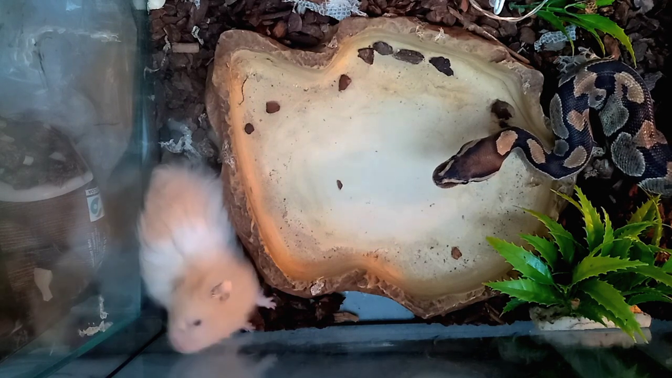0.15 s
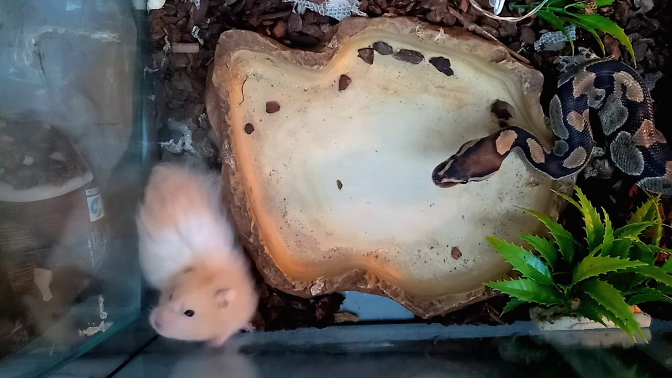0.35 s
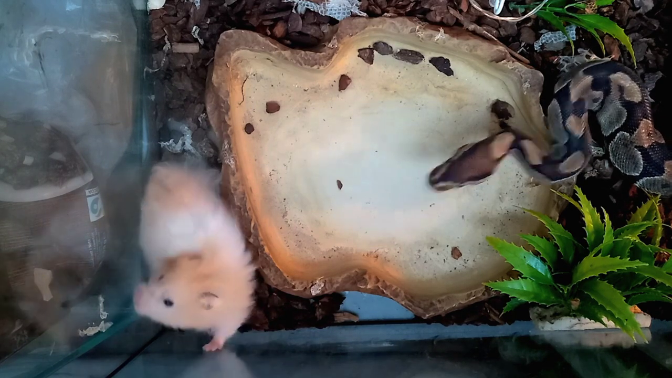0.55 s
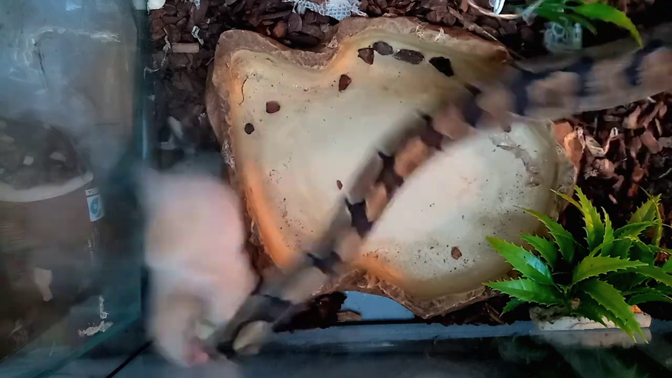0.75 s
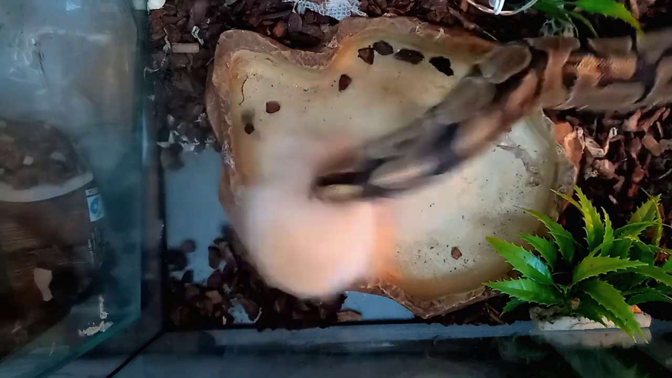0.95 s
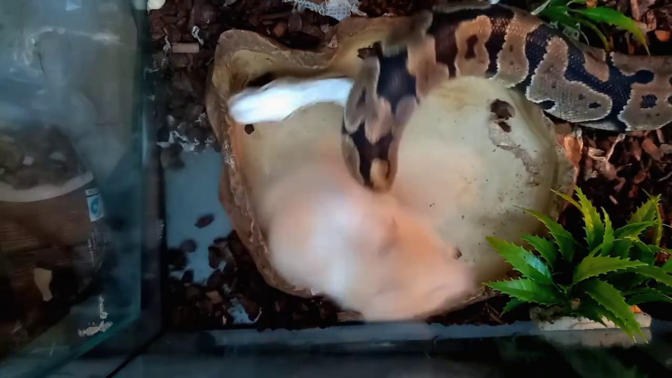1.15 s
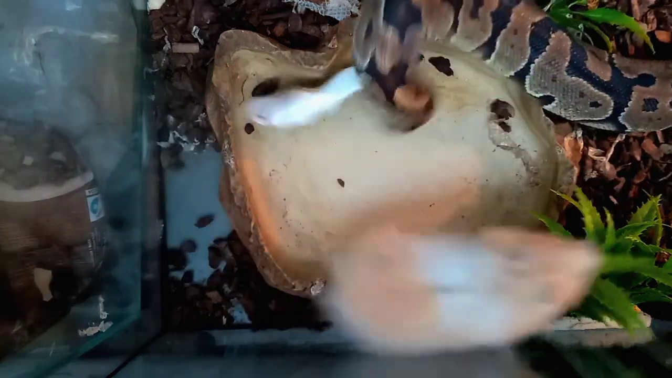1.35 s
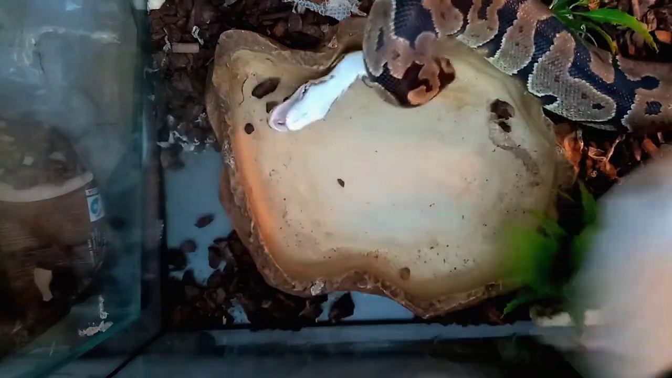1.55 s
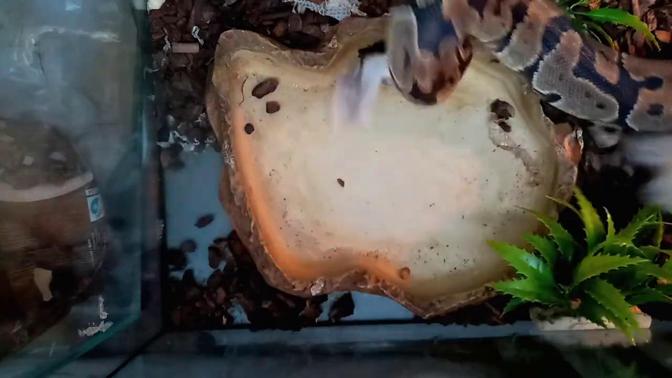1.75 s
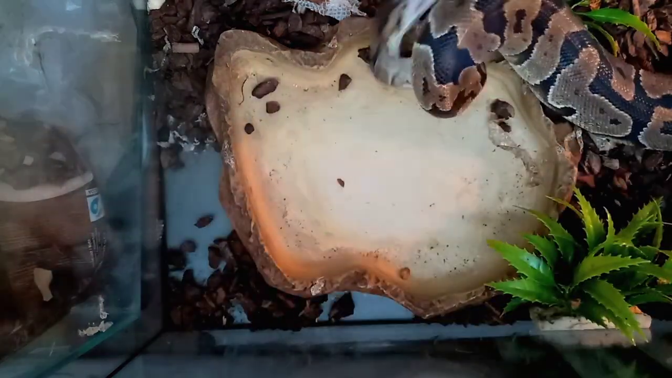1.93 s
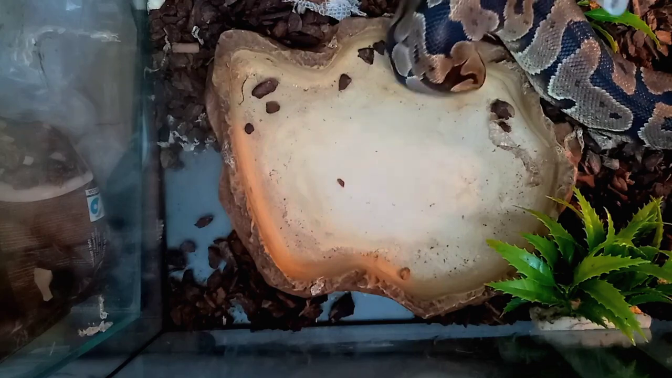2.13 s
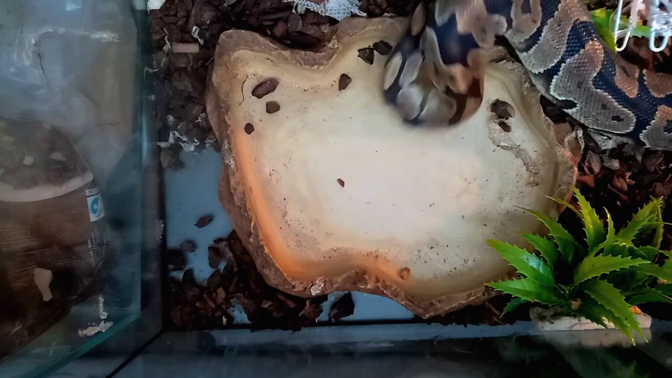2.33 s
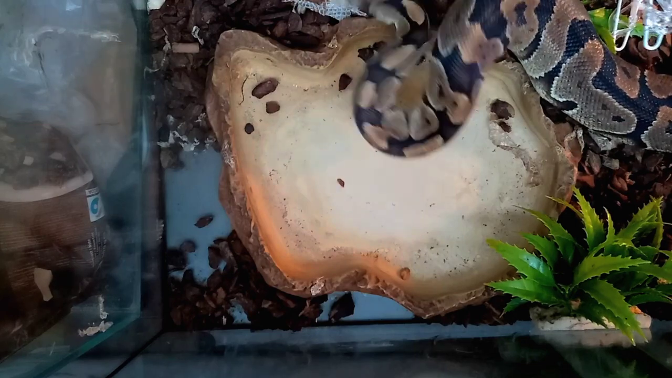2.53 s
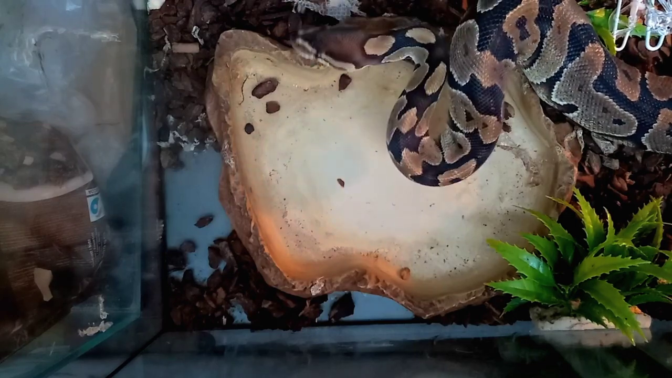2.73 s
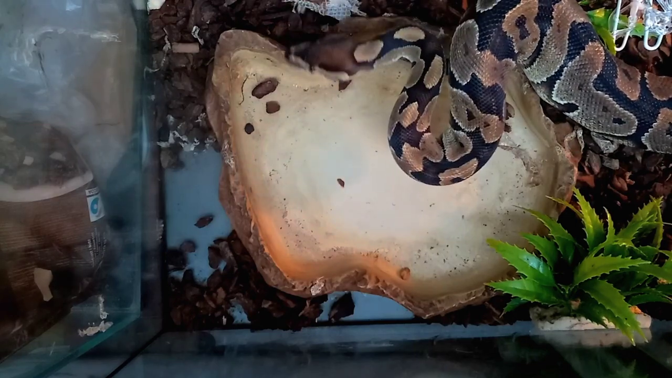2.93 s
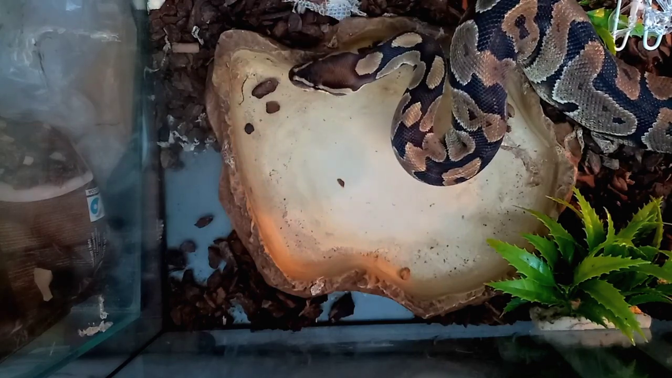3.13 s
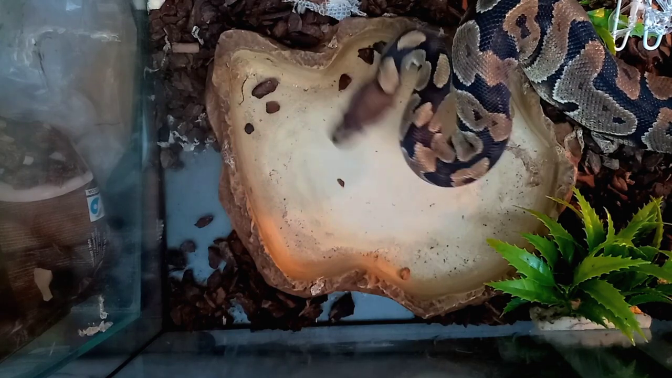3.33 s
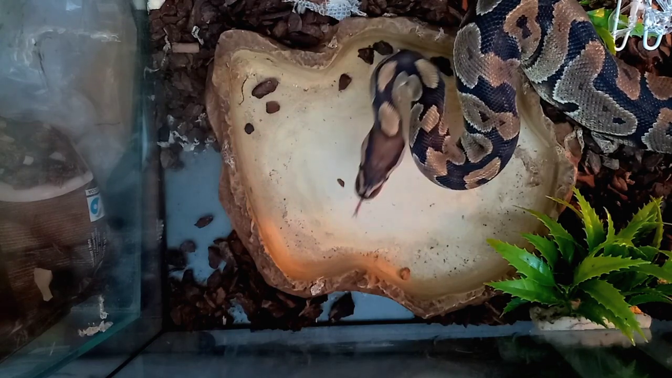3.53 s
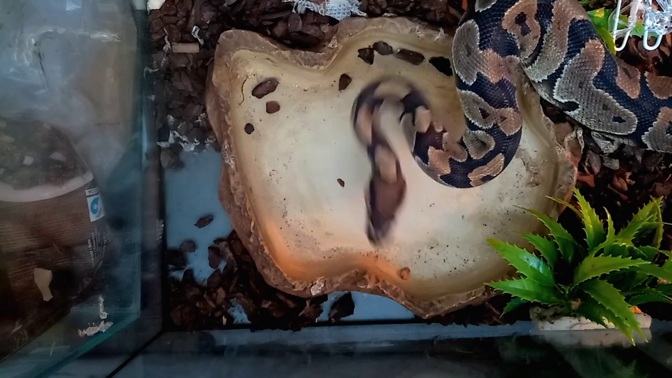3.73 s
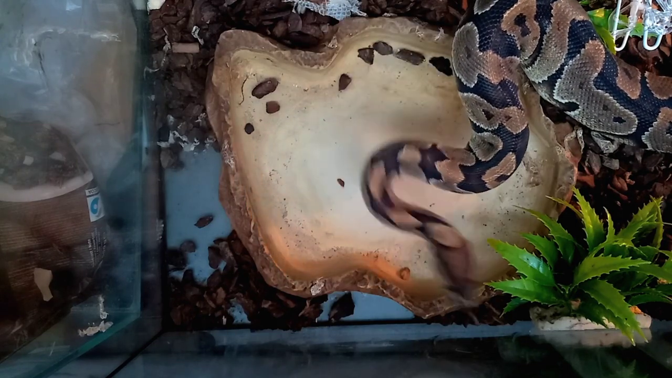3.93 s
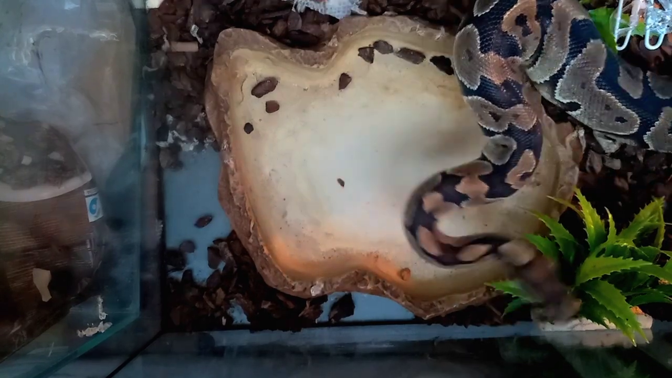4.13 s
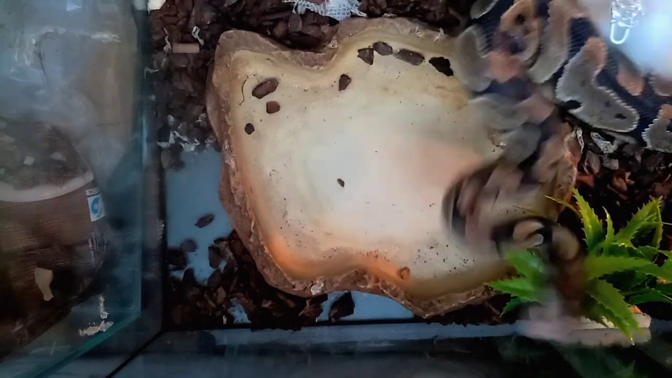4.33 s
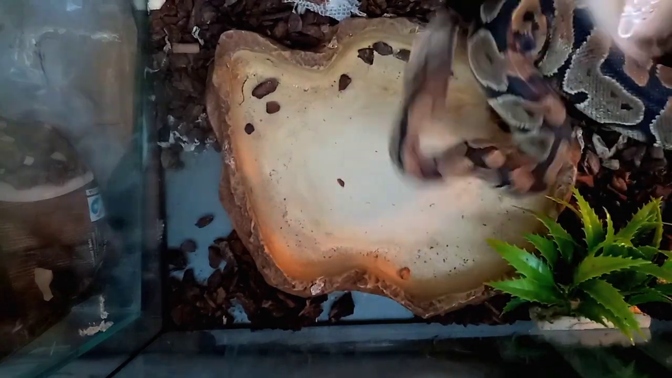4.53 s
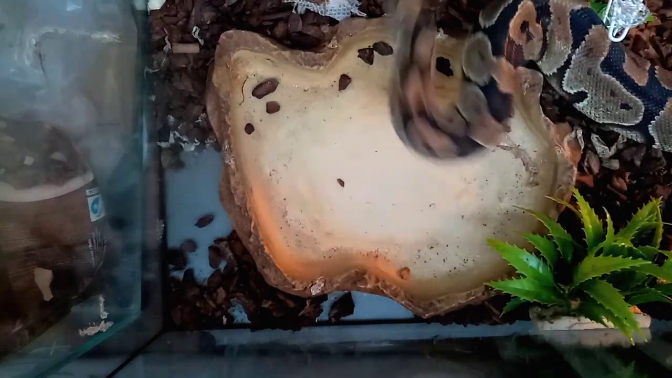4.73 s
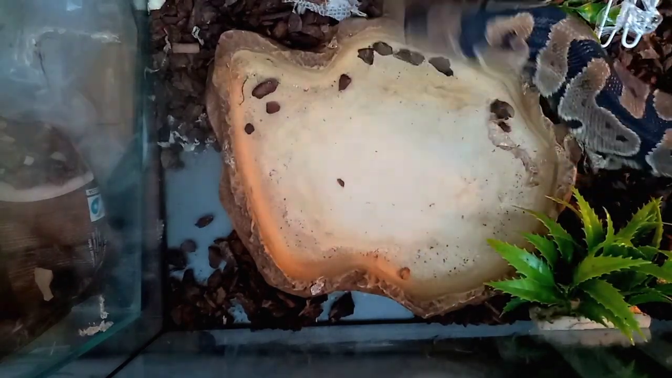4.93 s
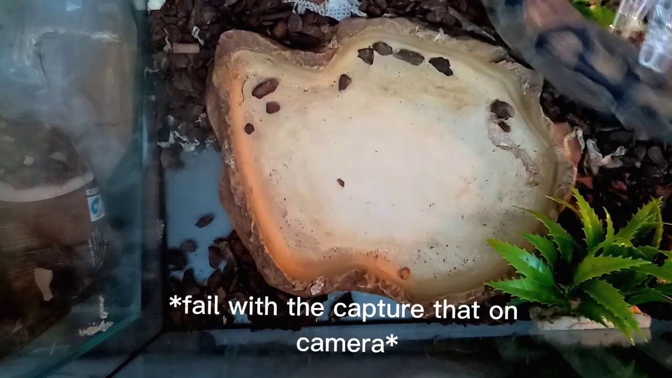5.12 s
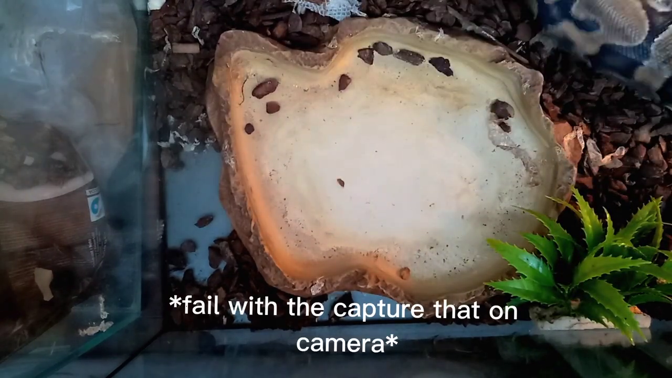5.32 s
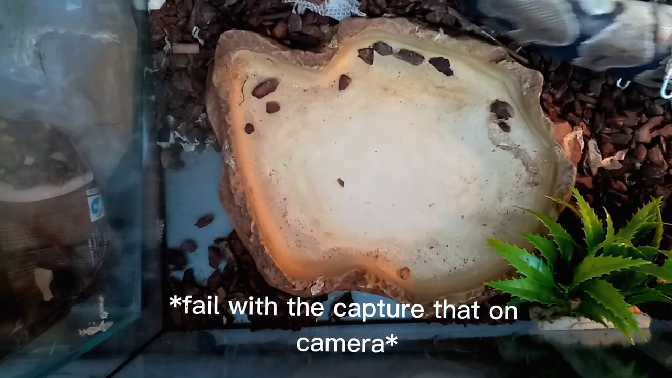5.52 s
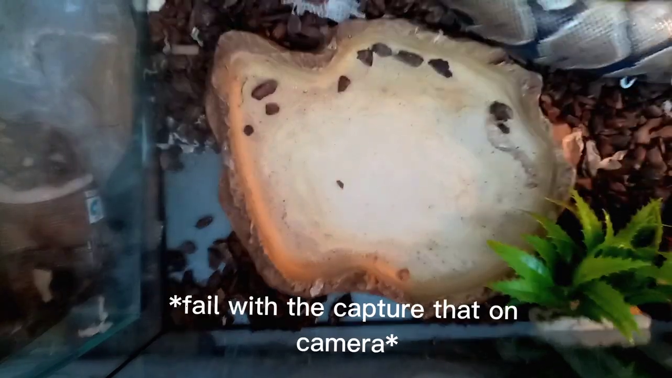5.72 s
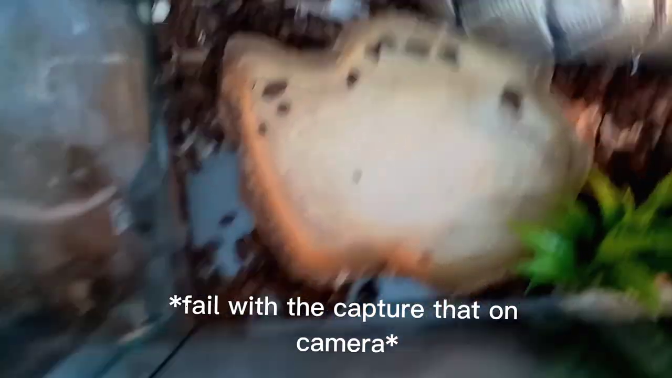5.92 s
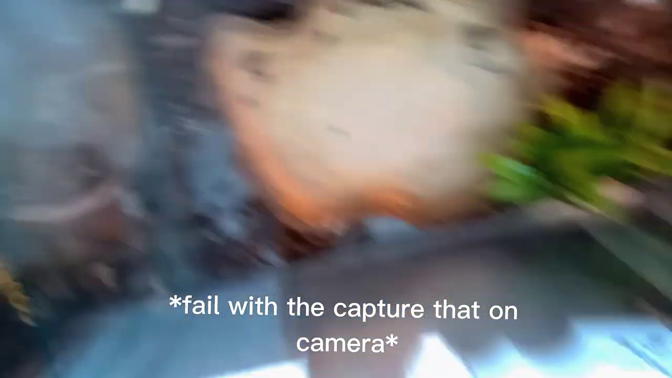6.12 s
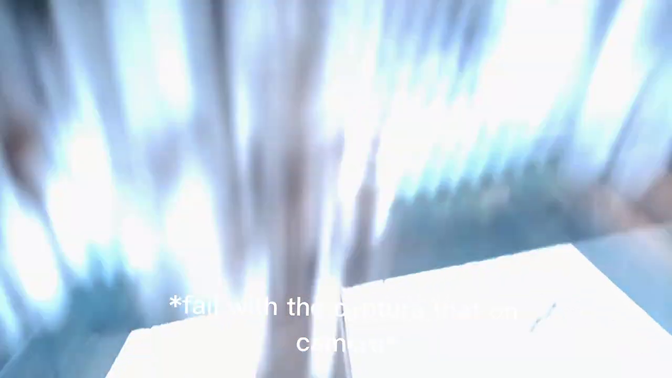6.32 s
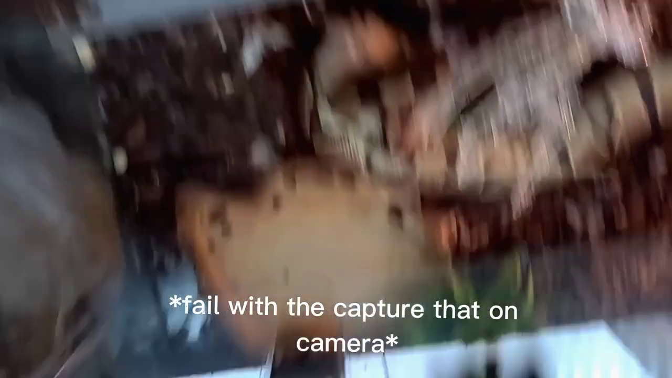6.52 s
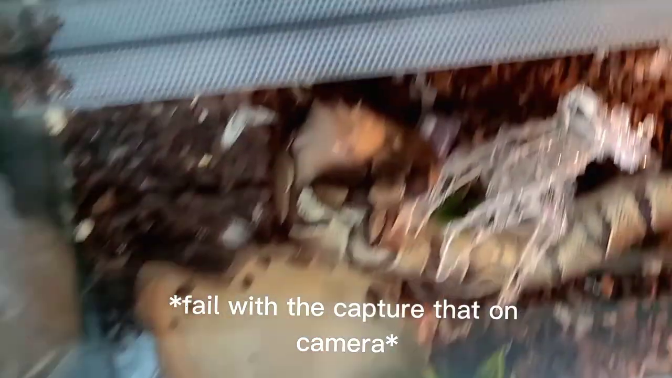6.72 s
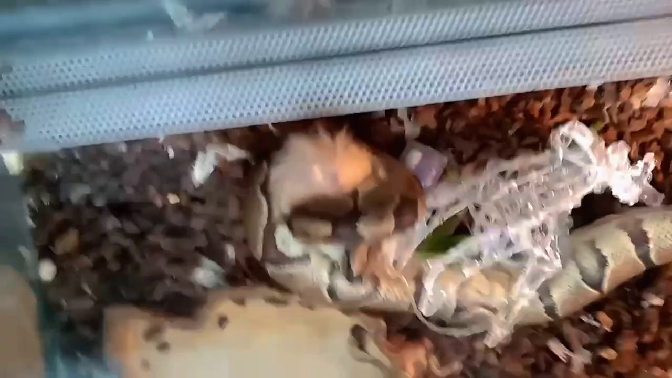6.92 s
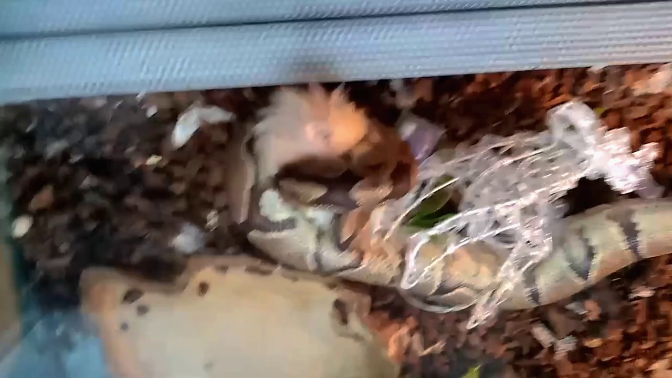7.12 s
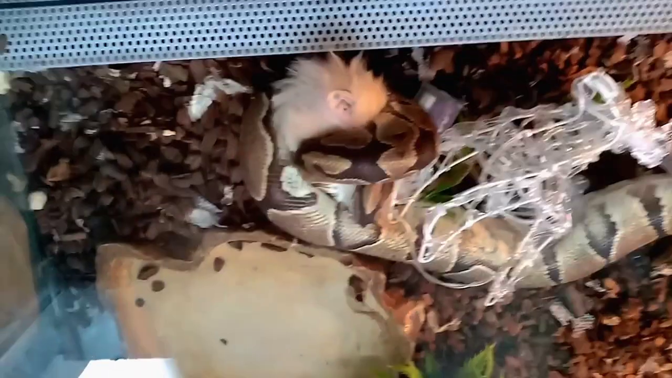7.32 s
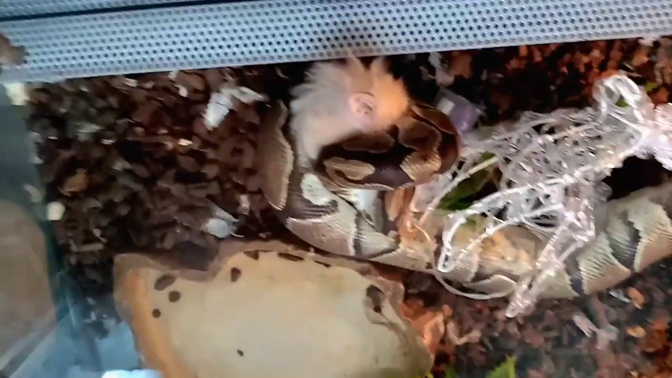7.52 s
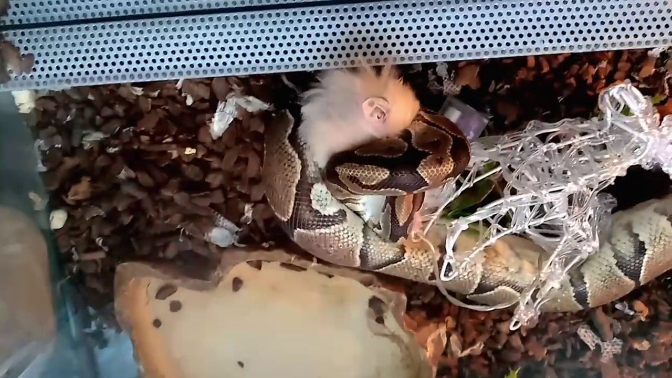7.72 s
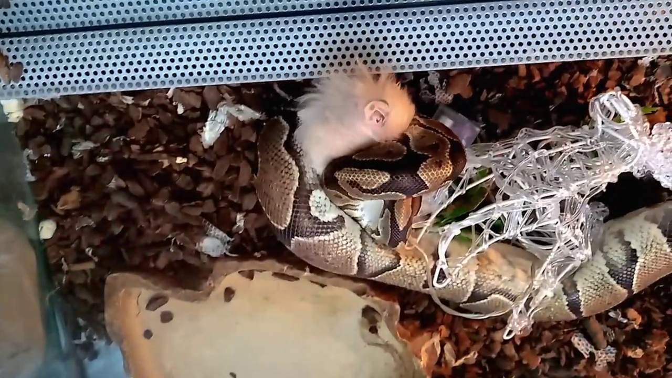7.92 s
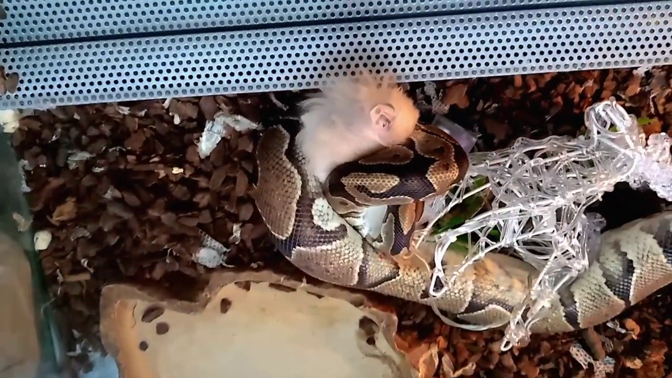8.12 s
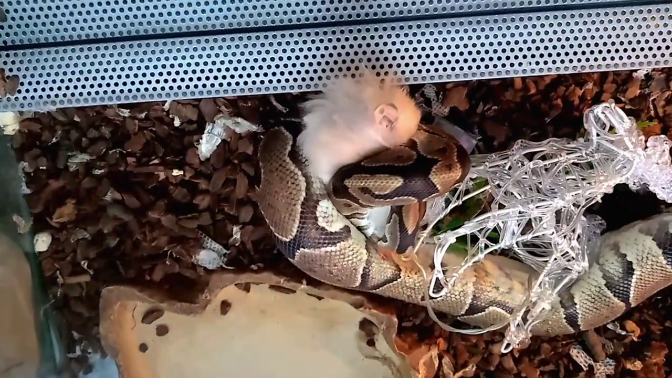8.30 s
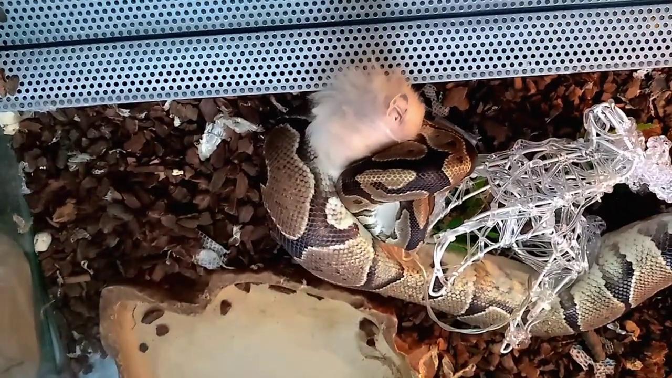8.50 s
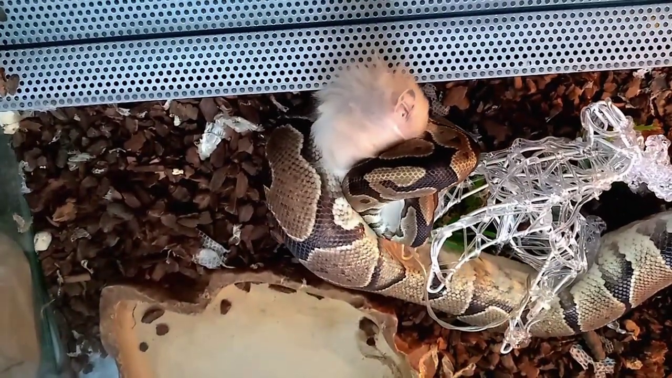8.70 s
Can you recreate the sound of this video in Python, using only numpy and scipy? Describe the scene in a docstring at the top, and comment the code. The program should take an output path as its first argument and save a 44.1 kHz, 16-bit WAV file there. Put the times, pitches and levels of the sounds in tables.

```python
"""In a glass tank a snake and a small rodent struggle. Bark bedding is thrown about, skin squeals over
dish and glass, bodies thump the base, and the air booms at one low note: shaped noise under drawn envelopes.
Knocks, thuds and clicks are noise bursts through resonances or colours; clicks and ticks add a brief tone.
Towards the end the struggle is faint, with stray knocks, clicks and ticks. Two microphone ports hear it,
the left earlier and louder over most of the range, above a faint steady room floor."""
import sys
import numpy as np
from scipy import signal
from scipy.fft import rfft, irfft, next_fast_len
from scipy.io import wavfile
from scipy.ndimage import uniform_filter1d, map_coordinates

SR = 44100
rng = np.random.default_rng(int(sys.argv[2]) if len(sys.argv) > 2 else 0)


def transcribe(signal):
    """Save signal, clipped to [-1, 1], as a 16-bit WAV file at the path in sys.argv[1]."""
    frames = np.atleast_2d(signal).T
    limited = np.clip(frames, -1, 1)
    pcm = np.round(limited * 32767).astype(np.int16)
    wavfile.write(sys.argv[1], SR, pcm)


def ratio_of_db(decibels):
    """Turn decibels (scalar or array-like) into linear amplitude factors; 0 dB maps to 1."""
    return 10 ** (np.asarray(decibels, float) / 20)


N = 386088

# Source levels are relative: each source has its own trim in its function.
# lunges and kicks in the bedding: (moment t/s, rise t/s, hold t/s, chip rustle level/dB, body scuff level/dB)
LUNGES = [(0.648, 0.025, .11, -35.5, -39), (0.808, .03, 0.08, -46.5, -42.5),
          (0.972, 0.11, .02, -45.5, -47.5), (1.051, 0.025, 0.031, -40, -35),
          (1.254, 0.0067, 0.044, -45, -38), (1.408, 0.013, .03, -36, -35),
          (1.506, 0.0055, 0.014, -37.5, -31.5), (1.599, 0.01, 0.0091, -36, -37.5),
          (1.672, 0.059, 0.07, -37.5, -37.5), (1.817, 0.12, 0.15, -55, -47),
          (2.151, 0.084, 0.039, -45, -38.5), (2.241, 0.025, .02, -39.5, -30),
          (2.275, 0.031, 0.015, -43, -28), (2.562, 0.14, 0.0089, -51, -55), (2.668, .015, 0.023, -48, -67),
          (2.753, 0.084, 0.067, -46.5, -45), (2.911, 0.13, 0.019, -51.5, -51.5),
          (3.05, 0.053, 0.016, -48.5, -50), (3.239, 0.13, 0.021, -52.5, -51),
          (3.364, 0.12, 0.03, -55, -49.5), (3.517, 0.31, 0.017, -51, -67), (3.7, 0.016, .02, -56.5, -68),
          (3.748, 0.059, 0.059, -50.5, -76), (3.88, 0.15, .08, -58, -68), (4.032, 0.3, 0.0086, -53.5, -50),
          (4.162, .015, 0.064, -55.5, -50), (4.313, 0.091, 0.06, -51, -47.5),
          (4.433, 0.045, 0.072, -38.5, -39), (4.599, 0.067, 0.0073, -45, -38),
          (4.753, 0.043, 0.14, -43, -41), (4.995, .01, .02, -30, -46), (5.018, 0.046, 0.033, -49, -25.5),
          (5.172, 0.27, .01, -42, -40), (5.256, 0.02, 0.0046, -43, -39.5),
          (5.275, 0.0036, 0.0092, -33, -37), (5.407, 0.056, 0.039, -53.5, -49),
          (5.501, 0.11, .02, -45, -39), (5.592, 0.012, 0.024, -55, -31), (5.681, .1, 0.038, -52, -43),
          (5.796, 0.16, 0.073, -48.5, -43), (5.907, .1, 0.051, -51.5, -46.5),
          (6.03, 0.22, 0.021, -46.5, -41), (6.14, 0.056, 0.037, -53.5, -58), (6.264, 0.21, 0.11, -60, -63),
          (6.542, 0.13, 0.068, -66.5, -67.5), (6.735, 0.11, 0.068, -62.5, -69),
          (6.887, 0.091, 0.13, -61, -57), (7.128, 0.023, 0.039, -55, -72), (7.335, .1, 0.0069, -62, -67.5),
          (7.466, 0.072, 0.15, -73.5, -72.5), (7.609, 0.019, 0.0031, -46, -61),
          (7.853, 0.14, 0.21, -77.5, -72.5), (8.186, 0.035, 0.0045, -69, -66),
          (8.231, 0.034, 0.0033, -90, -65), (8.504, 0.16, .3, -75.5, -74.5)]
# skin sliding over dish or glass: (moment t/s, rise t/s, hold t/s, level/dB, nominal squeal f/Hz)
SLIDES = [(0.628, 0.0077, 0.0043, -27.5, 930), (0.758, 0.084, .01, -34.5, 1505),
          (0.933, 0.17, .03, -39, 955), (1.193, .2, .02, -46, 986), (1.257, 0.009, .01, -43.5, 1015),
          (1.427, 0.024, .02, -39.5, 1010), (1.508, .005, 0.14, -37, 1655), (2.143, 0.018, .05, -38.5, 950),
          (2.296, 0.038, .02, -35, 1001), (2.56, .08, 0.011, -47, 1416), (2.77, 0.12, 0.027, -49, 1508),
          (2.918, .08, 0.0083, -46, 1364), (3.247, 0.14, 0.011, -48, 1400), (3.455, 0.26, .07, -53, 1010),
          (3.749, 0.067, .15, -52, 1091), (4.172, .02, 0.0017, -44.5, 988), (4.308, 0.035, .02, -47, 980),
          (4.443, 0.028, 0.0041, -35.5, 1290), (4.604, 0.032, 0.031, -35.5, 1385),
          (4.747, 0.027, 0.16, -44, 1074), (5.038, .04, 0.13, -36.5, 1500), (5.276, .004, .03, -25.5, 1290),
          (5.502, .01, 0.08, -34, 1380), (5.63, .015, 0.11, -36.5, 761), (5.886, .01, .02, -43, 1330),
          (6.029, .06, .02, -43.5, 992), (6.543, .01, .005, -55.5, 1882), (6.798, 0.054, .005, -50, 1983),
          (6.906, 0.082, .14, -48, 995), (7.14, 0.0098, .005, -44.5, 1232), (7.616, .04, 0.022, -37, 1627),
          (8.243, .015, .005, -47.5, 1000), (8.452, .05, .08, -71, 1710)]
# shoves against the tank: (moment t/s, rise t/s, hold t/s, boom level/dB)
SHOVES = [(0.635, .012, 0.034, -42), (.7, 0.058, .03, -30.5), (0.856, 0.13, 0.019, -40.5),
          (1.052, 0.17, .05, -42), (1.147, 0.057, 0.0064, -39), (1.21, .05, 0.0042, -42.5),
          (1.328, 0.055, .05, -35), (1.548, 0.046, 0.018, -40.5), (1.65, 0.17, 0.11, -42.5),
          (1.864, 0.014, 0.052, -38), (1.956, 0.068, .06, -42), (2.148, 0.04, 0.023, -40.5),
          (2.26, 0.066, 0.079, -25.5), (2.414, .05, 0.11, -44.5), (2.595, 0.14, 0.27, -61.5),
          (2.916, 0.068, 0.022, -57.5), (3.064, .015, 0.017, -52.5), (3.145, .05, 0.017, -60.5),
          (3.263, .15, .005, -62.5), (3.375, .015, .03, -52), (3.505, .025, 0.021, -49.5),
          (3.582, .04, .04, -61.5), (3.802, 0.089, .02, -59), (3.887, 0.023, .015, -49),
          (3.954, 0.024, 0.0086, -50), (4.018, 0.031, 0.02, -51), (4.2, 0.029, 0.079, -54),
          (4.373, 0.37, .005, -46), (4.439, 0.016, 0.13, -33.5), (4.529, 0.19, 0.12, -32.5),
          (4.722, 0.13, 0.19, -42), (4.998, 0.027, 0.048, -35.5), (5.078, 0.058, 0.073, -31),
          (5.231, 0.023, 0.0046, -39), (5.266, .02, 0.018, -32), (5.313, .02, 0.024, -32),
          (5.388, 0.11, 0.041, -31), (5.532, 0.14, 0.0066, -26.5), (5.599, 0.011, 0.044, -27.5),
          (5.777, 0.28, 0.09, -39.5), (5.946, 0.15, 0.058, -43), (6.048, 0.1, 0.073, -40.5),
          (6.304, 0.13, .17, -68), (6.663, 0.031, 0.047, -55), (6.801, 0.0086, 0.0042, -47),
          (6.946, 0.17, .02, -60), (7.031, .03, 0.064, -54.5), (7.163, 0.045, .05, -59),
          (7.334, 0.035, 0.051, -57), (7.525, 0.033, 0.02, -54.5), (7.582, 0.0078, 0.054, -45),
          (7.756, 0.018, 0.052, -52.5), (8.088, 0.25, .02, -70.5), (8.288, 0.12, 0.026, -60.5),
          (8.502, .2, 0.14, -73.5), (8.674, 0.021, 0.063, -52.5)]
# colour of bark chips rubbing: (f/Hz, level/dB)
CHIP_COLOUR = [(700, -25), (1500, 1), (2500, 1), (3800, -0.5), (6600, 4.5), (16000, 2)]
# colour of fur and scales dragging, before the base adds its own: (f/Hz, level/dB)
SCUFF_COLOUR = [(100, -43), (200, -4.5), (450, -1), (800, -4), (1200, -5.5), (2500, -30.5), (5000, -64)]
# low resonances of the air in the tank: (f/Hz, width f/Hz, level/dB)
TANK_AIR = [(137.74, 10, 4), (80, 44, -13.5), (189, 98, -13)]
# resonances of the tank's base under a body: (f/Hz, width f/Hz, level/dB)
BASE = [(214, 64, 2.5), (287, 59, -1.5), (460, 130, -1), (685, 120, -2), (930, 81, -4)]
# knocks on dish and wall: (t/s, level/dB, ring f/Hz, rattle t60 t/s, panes level/dB)
KNOCKS = [(1.286, -22, 897, 0.28, -6), (1.506, -7, 2404, 0.24, -7.5), (1.596, -10.5, 2540, 0.24, -4),
          (1.658, -10.5, 2480, 0.33, -4.5), (2.145, -33, 880, 0.31, -4.5), (2.524, -23, 975, 0.16, -47),
          (2.673, -29, 2930, 0.17, -9.5), (3.5, -37, 947, 0.25, -30), (3.996, -31, 980, 0.086, -16),
          (4.164, -39, 910, 0.22, -19), (4.425, -34.5, 1280, 0.18, 11), (4.597, -19, 1340, 0.16, -16.5),
          (4.737, -25.5, 1280, 0.2, -16), (5.28, -14.5, 1316, 0.31, -14), (5.51, -16.5, 1375, 0.18, -15.5),
          (5.885, -23, 1320, 0.21, -12), (6.744, -23, 984, 0.14, -13), (6.867, -29.5, 890, 0.18, -30),
          (7.033, -33, 1630, 0.34, -36), (7.126, -33, 3670, 0.18, -11), (7.616, -11.5, 1538, 0.13, -14.5)]
# resonances of glass and dish: (f/Hz, width f/Hz, level/dB)
WALLS = [(614, 50, -7), (930, 61, -1.5), (1330, 50, -0.5), (1710, 340, -8.5), (2663, 100, -4),
         (3060, 78, -5.5), (3100, 290, -4.5), (3570, 380, -14.5)]
# a heavy body lands on the tank's base: (t/s, level/dB, push t60 t/s)
THUDS = [(2.15, -25.5, 0.26), (2.248, -12.5, 0.31), (2.283, -10.5, 0.33), (4.43, -20.5, 0.34),
         (5.0, -15.5, .15), (5.035, -11, 0.37), (5.27, -18, 0.14), (5.6, -10, 0.1), (5.617, -12, 0.27),
         (8.258, -31.5, 0.13)]
# dry clicks of chips on glass:
# (t/s, level/dB, pitch f/Hz, snap level/dB, settling level/dB, left-right level/dB incl. USUAL_DB)
CLICKS = [(0.63, -31, 870, -17, -18, 10), (0.643, -19, 920, -20, -9, -10), (0.92, -26, 940, -15, -10, 17),
          (1.049, -20.5, 600, -24, 12.5, 6.5), (1.255, -28, 490, -8, -18, 11),
          (1.406, -22, 480, -14, -21, 12), (2.286, -7.5, 635, -28, -23, 21),
          (2.557, -32, 1270, -5.5, -13, 2), (3.049, -35, 3370, -18, -16, 8), (4.863, -33, 2830, -6, -6, 7),
          (4.994, -18.5, 2740, -6, -6, 9), (5.164, -26.5, 900, -5, -6, 7),
          (5.599, -4.5, 490, -17.5, -7.5, 11), (5.618, -11, 480, -21, -8.5, 22.5),
          (5.78, -12, 576, -23, -10, 10.5), (5.823, -18, 4220, 1, -20.5, 13),
          (6.258, -30.5, 3360, -31, -11, 20), (6.27, -29, 3460, -14.5, -5, 11),
          (6.348, -19.5, 3230, -14.5, -8, 10.5), (6.545, -23.5, 3460, -16.5, -2, 7.5),
          (6.91, -34.5, 1030, -9.5, -3.5, 2), (7.124, -23.5, 3600, -12, 0, 9),
          (7.588, -18, 544, -18.5, -6, 6.5), (8.198, -24.5, 880, 3, -28, 6),
          (8.214, -31.5, 1220, -22, -15.5, 17), (8.232, -23, 856, -24, -30, 16.5),
          (8.255, -27, 620, -12.5, -16.5, 24.5), (8.26, -31.5, 447, 1.5, -23, 2)]
# colour of the broad snap of a contact: (f/Hz, level/dB)
SNAP_COLOUR = [(200, -40.5), (600, -19.5), (1000, -10.5), (3500, 0), (5000, -9), (7500, -2.5),
               (16000, -12.5)]
# sharp ticks, stronger at the right port:
# (t/s, level/dB, after-rattle level/dB, left-right level/dB incl. USUAL_DB)
TICKS = [(6.7017, -45, -2.5, -19), (6.8035, -15, -19.5, -22), (7.3159, -29, -32, -30),
         (7.3206, -23.5, -20.5, -15)]
# small things make no bass: (f/Hz, level/dB)
LIGHT = [(80, -26.5), (300, -0.5)]
# how long tank and room ring on: (f/Hz, t60 t/s)
ROOM_DECAY = [(200, .3), (1000, 0.53), (4000, 0.62), (10000, 0.15)]
# colour of the room floor: (f/Hz, level/dB)
FLOOR_COLOUR = [(15, -51.5), (25, -2), (130, 3.5), (796, -6.5), (887, -2), (1070, -4), (1230, -5),
                (2410, -7.5), (2610, -11), (6920, -13), (8360, -24.5), (9840, -25.5), (16000, -25)]
# treble falls away above 8 kHz: (f/Hz, level/dB)
TREBLE = [(7400, 0.5), (8300, -9.5), (9900, -25), (13400, -37), (14900, -32), (16000, -42.5)]
# microphone bass loss: (f/Hz, level/dB)
LOW_CUT = [(25, -13), (70, 1.5), (100, -0.5)]
# left minus right port: (f/Hz, level/dB)
PORTS = [(60, 3), (130, 6), (290, 7), (640, 9), (1410, 11.5), (3100, 11), (6820, 4), (15000, -10.5)]
# how alike the noise is at both ports: (f/Hz, likeness 0..1)
ALIKE = [(60, 0.79), (200, 0.92), (500, 0.66), (2500, 0.083), (8000, 0.06)]

USUAL_DB = 8  # the ports' usual left-right balance
LAG_S = 0.000849  # extra path to the right port
RISE_DB = 20  # climbed within a rise time
RISE_BEND = 1.29  # above 1: steep at first, rounding off at the top
RUSTLE_FALL_DB_S, SCUFF_FALL_DB_S, SLIDE_FALL_DB_S, BOOM_FALL_DB_S = 169.5, 166.5, 193, 380
SCUFF_LAG_S = 0.012  # the body drags just after the chips fly
STEP = 64  # samples between envelope points


def unit(x):
    """Scale to rms 1."""
    return x / np.sqrt(np.mean(x ** 2) + 1e-20)


def along(points, hz):
    """Read a curve of (f/Hz, value) points on a log frequency axis."""
    f, v = np.transpose(points)
    return np.interp(np.log(hz + 1), np.log(f + 1), v)


def filtered(x, response):
    """Shape x by a complex response of frequency."""
    n = x.shape[-1]
    m = next_fast_len(n + 8192)
    return irfft(rfft(x, m) * response(np.fft.rfftfreq(m, 1 / SR)), m)[..., :n]


def coloured(x, *curves):
    """Equalise x by the sum of level/dB curves."""
    return filtered(x, lambda hz: ratio_of_db(sum(along(curve, hz) for curve in curves)))


def modes(table):
    """Causal response of a set of resonances, added with alternating sign."""
    def response(f):
        total = 0
        for k, (centre, width, db) in enumerate(table):
            damping = 1j * f * width
            total = total + (-1) ** k * ratio_of_db(db) * damping / (centre ** 2 - f ** 2 + damping)
        return total
    return response


def pair(n):
    """Noise at two ports: a shared part and a part of opposite sign, mixed to the likeness curve."""
    def mid_side(hz):
        angle = np.arccos(np.clip(along(ALIKE, hz), -1, 1)) / 2
        return np.array([np.cos(angle), np.sin(angle)])
    mid, side = filtered(rng.standard_normal((2, n)), mid_side)
    return np.array([mid + side, mid - side])


def wobble(knot_s):
    """A smooth random curve with a knot every knot_s."""
    knots = rng.standard_normal(int(N / SR / knot_s) + 4)
    return map_coordinates(knots, [np.arange(N) / SR / knot_s])


def fine(v):
    """Envelope points joined up to one value per sample."""
    return np.interp(np.arange(N) / STEP, np.arange(len(v)), v)


def strokes(s, rise_s, hold_s, db, fall_db_s):
    """Power of each stroke over time: it rises to its moment, holds, then fades."""
    t = np.arange(0, N + STEP, STEP) / SR - s[:, None]
    early = np.clip(-t, 0, None)
    late = np.clip(t - hold_s[:, None], 0, None)
    climb_db = RISE_DB * (early / rise_s[:, None]) ** RISE_BEND
    return ratio_of_db(2 * (db[:, None] - climb_db - fall_db_s * late)) + 1e-20


def struggle():
    """Chips rustle, bodies scuff and slide, and every shove sets the tank's air booming."""
    s, rise_s, hold_s, rustle_db, scuff_db = np.transpose(LUNGES)
    *slides, slide_hz = np.transpose(SLIDES)
    rustles = strokes(s, rise_s, hold_s, rustle_db, RUSTLE_FALL_DB_S)
    scuffs = strokes(s + SCUFF_LAG_S, rise_s, hold_s, scuff_db, SCUFF_FALL_DB_S)
    slips = strokes(*slides, SLIDE_FALL_DB_S)
    booms = strokes(*np.transpose(SHOVES), BOOM_FALL_DB_S)
    rustling, scuffing, slipping, booming = (
        fine(np.sqrt(power.sum(axis=0))) for power in (rustles, scuffs, slips, booms))
    squeal_hz = fine(slide_hz @ slips / slips.sum(axis=0))  # the strongest slide leads the pitch
    out = ratio_of_db(8.5) * rustling * rustle()
    out += scuffing * scuff()
    out += ratio_of_db(-4.5) * slipping * unit(sliding(squeal_hz, width=.08, overtone_db=-9, broad_db=-11))
    out += booming * ratio_of_db(1.6 * wobble(.025)) * boom()
    return out


def rustle():
    """Bark chips rubbing: fine-grained contact noise, coloured."""
    return unit(coloured(grainy(grain_s=.003, depth_db=2.1, patchy_db=1.6), CHIP_COLOUR))


def scuff():
    """Fur and scales dragging: coarser contact noise, reinforced by the base's resonances."""
    drag = grainy(grain_s=.008, depth_db=1.73, patchy_db=2.0)
    return unit(filtered(drag, lambda hz: ratio_of_db(along(SCUFF_COLOUR, hz)) * (0.6 + np.abs(modes(BASE)(hz)))))


def sliding(pitch_hz, width, overtone_db, broad_db):
    """A rough squeal of skin on a smooth surface: noise in a narrow moving resonance and its octave."""
    skin = grainy(grain_s=.005, depth_db=2.5, patchy_db=4.2)
    hz, t, z = signal.stft(skin, SR, nperseg=512)
    centre = np.interp(t, np.arange(N) / SR, pitch_hz)

    def peak(ratio, relative_width):
        return 1 / (1 + ((hz[:, None] / (ratio * centre) - 1) / relative_width) ** 2)

    shape = peak(0.98, width)
    shape += ratio_of_db(overtone_db) * peak(2, width / 2)
    shape += ratio_of_db(broad_db) * peak(0.73, 1.0)
    return signal.istft(z * shape, SR, nperseg=512)[1][:, :N]


def boom():
    """The tank's air: noise through its low resonances, narrowed again around the main note."""
    air = filtered(pair(N), modes(TANK_AIR))
    return unit(steadied(filtered(air, modes([(145, 96, 0)])), share=0.57))


def steadied(x, share):
    """A resonance kept swinging: part of its random beating is taken out."""
    swing = np.abs(signal.hilbert(x, next_fast_len(N)))[:, :N]
    return x / (swing + 1e-9) ** share


def grainy(grain_s, depth_db, patchy_db):
    """Noise made of short contacts of uneven size that come in clumps, its colour shifting in patches."""
    sizes_db = depth_db * (wobble(grain_s) + .7 * wobble(8 * grain_s))
    z = signal.stft(pair(N) * ratio_of_db(sizes_db), nperseg=512)[2]
    field = uniform_filter1d(rng.standard_normal(z.shape[1:]), size=4, axis=0)  # smooth over frequency
    field = uniform_filter1d(field, size=10, axis=1)  # and over time
    return signal.istft(z * ratio_of_db(patchy_db * unit(field)), nperseg=512)[1][:, :N]


def knocks():
    """A body strikes dish or wall: a hard blow, then a rattle that rings at one place and shakes the panes."""
    out, t = np.zeros((2, N + SR)), np.arange(SR // 2) / SR
    for s, db, ring_hz, t60, panes_db in KNOCKS:
        force = ratio_of_db(-60 * t / t60) + 0.55 * ratio_of_db(-60 * t / 0.023)
        shake = force * pair(len(t))
        hollow = modes([(ring_hz, 0.19 * ring_hz, 4), (2 * ring_hz, 0.049 * ring_hz, -1.5)])
        ring = filtered(shake, lambda hz: hollow(hz) ** 2)  # a steep, hollow resonance and its octave
        rattle = ratio_of_db(panes_db + 19) * filtered(shake, modes(WALLS))
        out[:, round(s * SR):][:, :len(t)] += ratio_of_db(db - 6.0) * (ring + rattle)
    return out[:, :N]


def thuds():
    """A soft, heavy landing: a dense burst that shakes the base and dies away smoothly."""
    out, t = np.zeros((2, N + SR)), np.arange(SR // 2) / SR
    base, body = modes(BASE), modes([(280, 500, 0)])
    for s, db, t60 in THUDS:
        push = (1 - np.exp(-t / 0.0062)) * ratio_of_db(-60 * t / t60) * pair(len(t))
        thud = filtered(push, lambda hz: base(hz) * body(hz))
        out[:, round(s * SR):][:, :len(t)] += ratio_of_db(db + 8) * thud
    return out[:, :N]


def panned(pan_db):
    """Gains of left and right, less the usual balance that the ports add later."""
    return ratio_of_db(np.array([[1], [-1]]) * (pan_db - USUAL_DB) / 2)


def clicks():
    """A hard, brief contact: the chip's note for a moment, a broad snap, and chips settling after it."""
    out, t = np.zeros((2, N + SR)), np.arange(SR // 4) / SR
    for s, db, pitch_hz, snap_db, settle_db, pan_db in CLICKS:
        note = 0.7 * np.sin(2 * np.pi * pitch_hz * t) * ratio_of_db(-60 * t / 0.016)
        force = ratio_of_db(-60 * t / 0.0044) + ratio_of_db(settle_db - 60 * t / 0.11)
        snap = ratio_of_db(snap_db + 12) * coloured(force * pair(len(t)), SNAP_COLOUR)
        out[:, round(s * SR):][:, :len(t)] += ratio_of_db(db - 2.33) * panned(pan_db) * (note + snap)
    return coloured(out[:, :N], LIGHT)


def ticks():
    """A single sharp spike, a 3.5 kHz tone gone in about a millisecond, with a rattle behind it."""
    out, t = np.zeros((2, N + SR)), np.arange(SR // 8) / SR
    for s, db, rattle_db, pan_db in TICKS:
        spike = np.cos(2 * np.pi * 3500 * t) * ratio_of_db(-60 * t / 0.0011)
        rattle = ratio_of_db(rattle_db - 60 * t / 0.073) * pair(len(t))
        out[:, round(s * SR):][:, :len(t)] += ratio_of_db(db - 4.0) * panned(pan_db) * (spike + rattle)
    return coloured(out[:, :N], LIGHT)


def room(x):
    """Tank and room answer: a noise tail in which each frequency dies at its own speed."""
    hz, t, z = signal.stft(rng.standard_normal((2, SR // 2)), SR, nperseg=256)
    fade = ratio_of_db(-60 * t / along(ROOM_DECAY, hz)[:, None])
    tail = signal.istft(z * fade, SR, nperseg=256)[1]
    return signal.fftconvolve(x, tail / np.linalg.norm(tail[0]), axes=1)[:, :N]


def floor():
    """Faint steady room noise, different at each port."""
    return ratio_of_db(-72.5) * unit(coloured(rng.standard_normal((2, N)), FLOOR_COLOUR))


def scene():
    """All sources before the ports' difference; only knocks and clicks get the room's answer."""
    hits = knocks() + clicks()
    tank = struggle() + hits + ratio_of_db(-17) * room(hits) + ticks() + thuds()
    return coloured(tank, TREBLE, LOW_CUT) + floor()


def roll_off(x):
    """The treble ends steeply here."""
    return signal.sosfilt(signal.butter(12, 15900, fs=SR, output="sos"), x)


def record(dry):
    """The left port hears first and is louder over most of the range; the right leads in the top treble."""
    sides = np.array([[1], [-1]]) / 2

    def port(hz):
        return ratio_of_db(sides * along(PORTS, hz)) * np.exp(2j * np.pi * hz * LAG_S * sides)

    mix = filtered(dry, port)
    return roll_off(mix)


dry = scene()
out = record(dry)
transcribe(out)
```